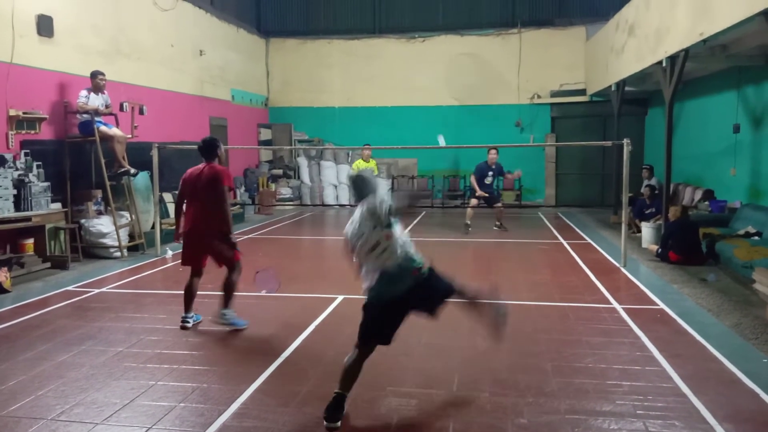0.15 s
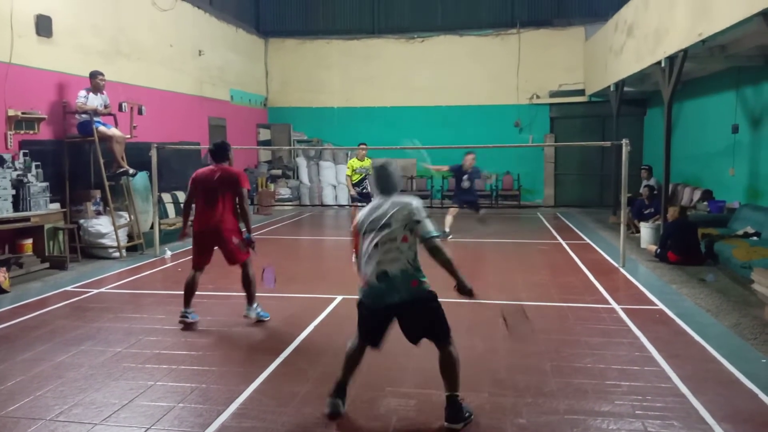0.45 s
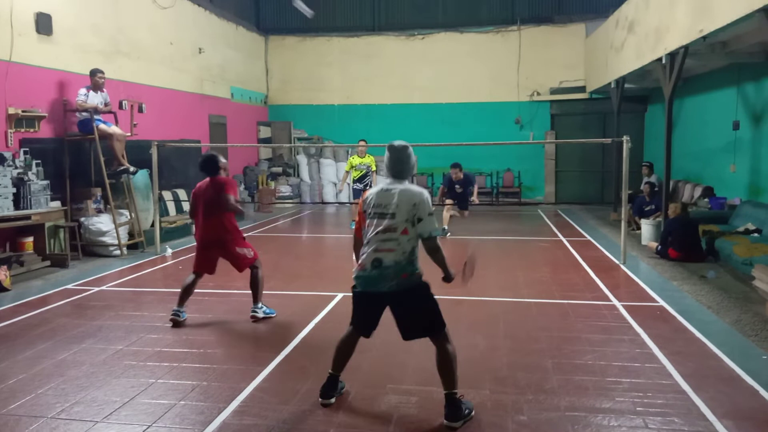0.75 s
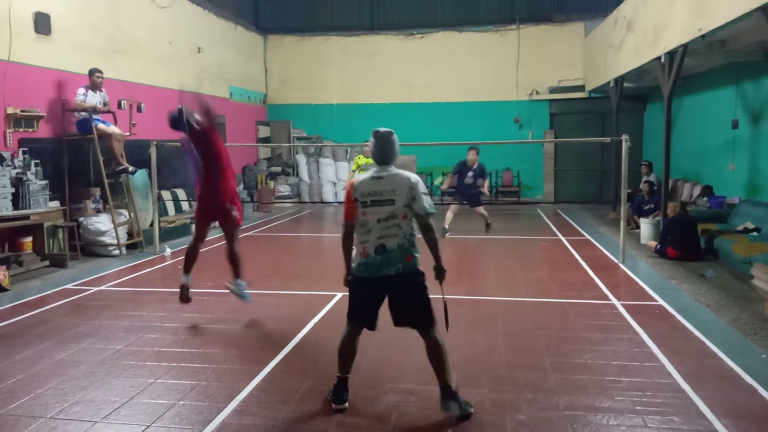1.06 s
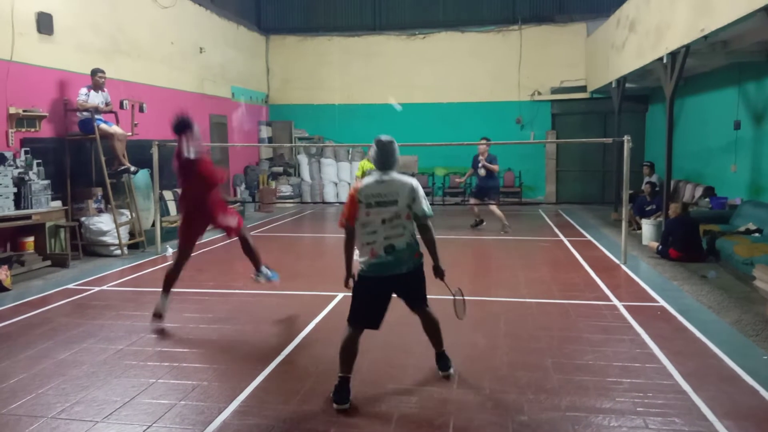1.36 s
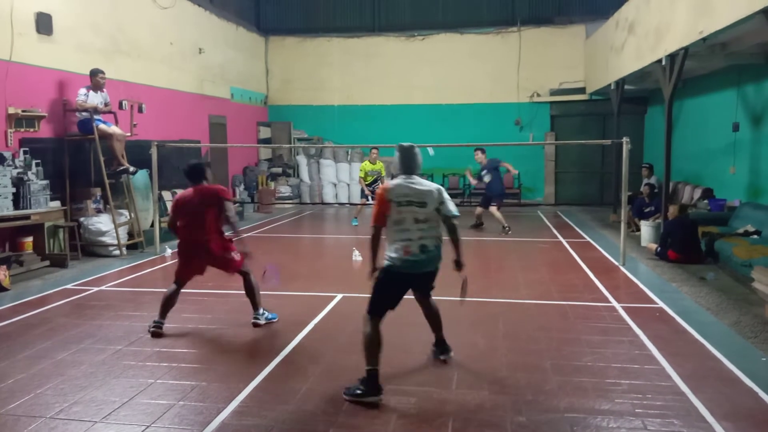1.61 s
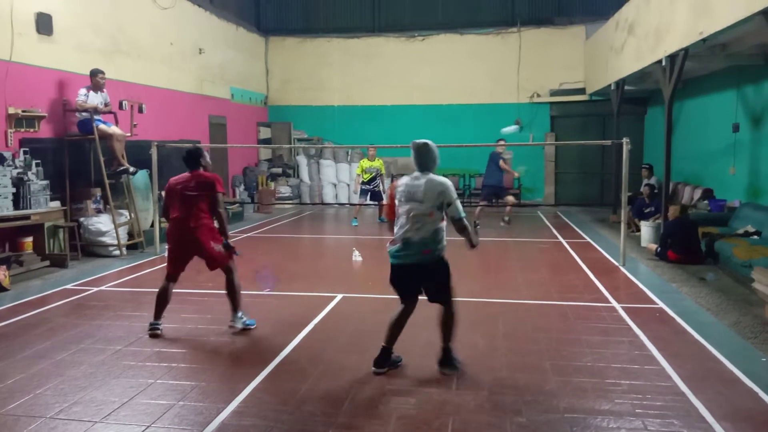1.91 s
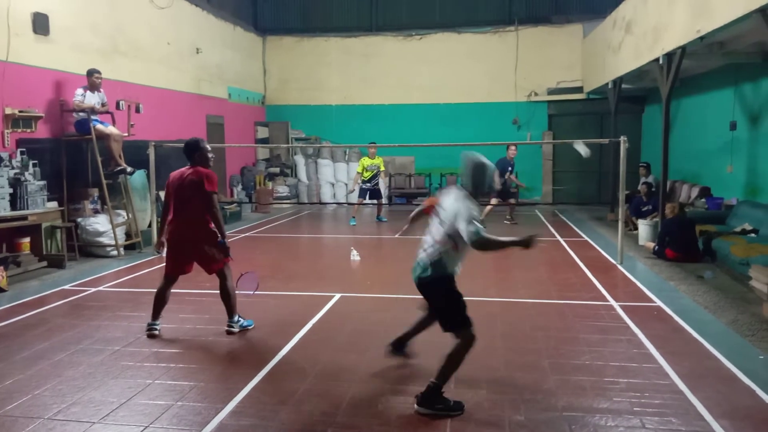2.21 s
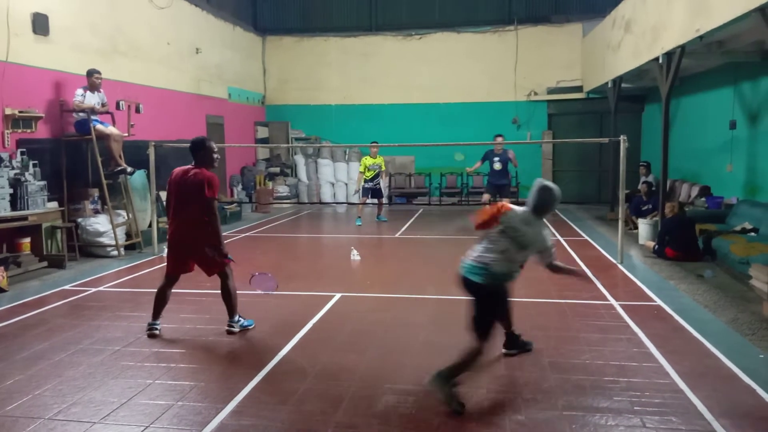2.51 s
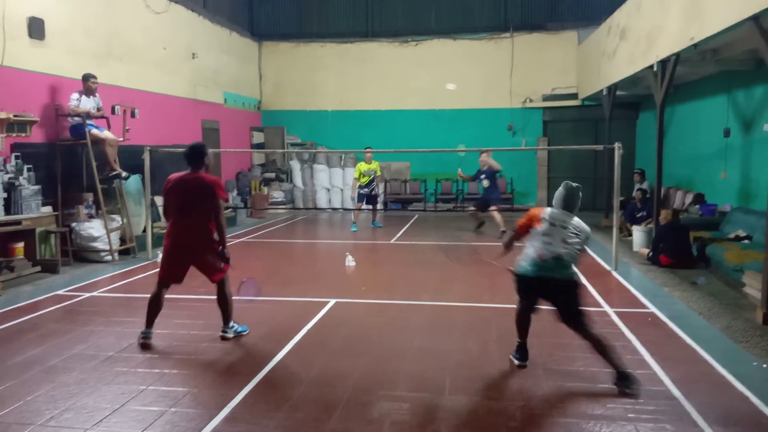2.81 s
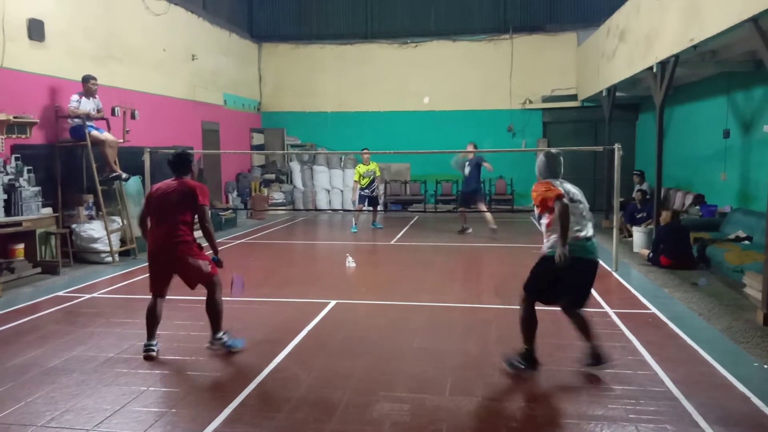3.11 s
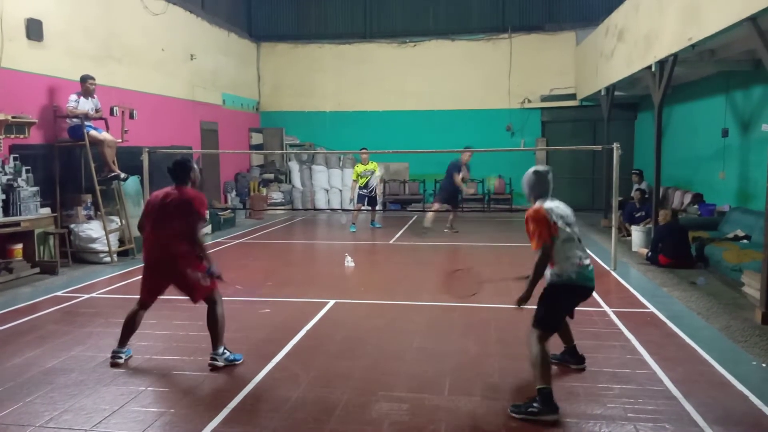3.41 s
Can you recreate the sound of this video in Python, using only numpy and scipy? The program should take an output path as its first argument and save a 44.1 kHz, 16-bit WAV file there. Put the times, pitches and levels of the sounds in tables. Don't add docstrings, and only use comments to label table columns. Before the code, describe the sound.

Sharp racket smacks in a badminton rally ring through a hard-walled hall between quick footsteps.

```python
import sys
import numpy as np
from scipy import signal
from scipy.fft import rfft, irfft
from scipy.io import wavfile
from scipy.ndimage import uniform_filter1d

SR = 44100
rng = np.random.default_rng(int(sys.argv[2]) if len(sys.argv) > 2 else 0)


def wrap_up_sound(samples):
    columns = np.atleast_2d(samples).T
    tamed = np.clip(columns, -1, 1)
    steps = np.round(tamed * 32767).astype(np.int16)
    wavfile.write(sys.argv[1], SR, steps)


def nominal_scale(level):
    x = np.asarray(level, float) / 20
    return 10 ** x


N = 156555
SPAN = 65536

# start_s, level_db, ring_hz, ring_db, tilt_db_per_octave
NEAR_HITS = [
    (-.002, -5.5, 1160, -35.5, 0.49),
    (1.205, -7, 2000, -38.5, -0.2),
    (2.589, -4.5, 1070, -34, -0.14),
]
LIFTS = [
    (1.785, -12.5, 2584, -19.5, 0.06),
]
CLEARS = [
    (3.305, -3, 2220, -31.5, -0.52),
]
# delay_s, level_db
NEAR_ECHOES = [(.0032, -4), (.0062, -4), (.0112, -6), (.0162, -9)]
LIFT_ECHOES = [(.0078, 6.5), (.0135, 2), (.0312, -1), (.0385, 0)]
CLEAR_ECHOES = [(.0028, -2), (.013, -3), (.0312, -3), (.0385, -2)]
FOOT_ECHOES = [(.0062, -9), (.0112, -7), (.0362, -10)]
# frequency_hz, t60_s
HALL_T60 = [(100, 1.13), (300, 0.73), (800, 0.95), (2600, 1.34), (6000, 1.41), (10000, 1.14), (13000, 0.9),
            (16000, 0.8)]
# rise_s, wall_return_s, wall_spread_s, wall_swell_db
NEAR_HALL = (.003, .086, .018, 3)
FAR_HALL = (.006, .04, .012, 2.5)
FOOT_HALL = (.008, .08, .02, 2)
# frequency_hz, level_db_per_hz
AIR = [(60, -4), (130, 7), (300, 0.5), (750, -10), (2500, -3.5), (6000, -10.5), (11000, -5), (15000, -15)]
# start_s, thud_db, thud_hz, slap_db, hall_db
STEPS = [(.06, -31.5, 212, -45, -20.5), (0.158, -32.5, 182, -27, -30.5), (.339, -27.5, 323, -10, -28),
         (.507, -24.5, 255, -11, -22), (0.934, -65, 199, -36.5, -28.5), (1.017, -52, 285, -25, -31.5),
         (1.205, -23, 275, -36, -29), (1.271, -26.5, 295, -29, -23.5), (1.446, -34.5, 244, -42, -25.5),
         (1.5, -26.5, 230, -16, -26.5), (1.702, -35.5, 328, -17.5, -33), (2.14, -41, 290, -37, -25),
         (2.198, -29, 278, -25, -34), (2.243, -38.5, 312, -25.5, -40), (2.59, -19, 256, -32, -25.5),
         (2.856, -27.5, 258, -19, -28.5), (2.94, -51, 302, -21.5, -18.5), (3.11, -47.5, 202, -23.5, -32),
         (3.234, -43, 297, -12, -28.5), (3.307, -25, 248, -55, -18), (1.95, -39.5, 323, -48, -19)]
# start_s, level_db, pitch_hz, swell_s, fade_s
BOOMS = [
    (0.341, -36, 122, 0.13, .15),
    (0.509, -47, 127, .01, 0.071),
    (1.5, -46, 69.6, .02, 0.052),
]
# peak_s, level_db, centre_hz, rise_s, hiss_db
SCUFFS = [
    (.36, -42.5, 2640, 0.026, -5),
    (.97, -68, 2310, 0.042, 11.5),
    (1.708, -45, 2580, 0.0091, -5),
    (2.871, -35.5, 2480, 0.0083, -8),
]
# peak_s, level_db, whoosh_hz, rise_s, string_hiss_db
SWISHES = [
    (1.183, -41.5, 490, 0.017, -1),
    (1.784, -41, 920, 0.0043, -19),
    (2.559, -44, 444, 0.025, -1),
    (3.298, -52, 870, 0.014, -16),
]
# start_s, level_db, centre_hz, width_hz, hall_db
TICKS = [
    (1.57, -11, 4640, 8000, -44),
    (1.61, -3.5, 4170, 5950, -41),
    (2.868, -7, 2410, 705, -26),
    (3.49, -4.5, 4920, 950, -20.5),
]
# frequency_hz, gain_db
MIC = [(40, -19), (90, -5), (135, -2), (5000, 1.5), (6500, 7.5), (9000, -5.5), (12800, -14.5),
       (15000, -4.5)]

CRACK_S, SLAP_S, ECHO_S = .0009, .0054, .0015


def curve(hz, points):
    p = np.array(points, float)
    return np.interp(np.log(np.maximum(hz, 1)), np.log(p[:, 0]), p[:, 1])


def colour(x, points):
    log_gain = curve(np.fft.rfftfreq(4096, 1 / SR), points) * np.log(10) / 20
    cepstrum = irfft(log_gain)
    cepstrum[1:2048] *= 2
    cepstrum[2049:] = 0
    response = irfft(np.exp(rfft(cepstrum)))[:2048]
    return signal.fftconvolve(x, response)[:len(x)]


def band(x, hz, width_hz):
    return signal.lfilter(*signal.iirpeak(min(hz, .45 * SR), hz / width_hz, SR), x)


def click(size=4096):
    return 1. * (np.arange(size) == 0)


def hit(db, ring_hz, ring_db, tilt_db):
    t = np.arange(4096) / SR
    body = [(70, -12), (250, -2 * tilt_db + 1), (1200, 4.0), (10000, 5.4 * tilt_db)]
    crack = colour(click(), body)
    ring_t60_s = .011
    ring = nominal_scale(ring_db - 60 * t / ring_t60_s) * np.cos(2 * np.pi * ring_hz * t)
    return nominal_scale(db) * (crack + ring)


def rough_contact(decay_s, size=1024):
    spatter = rng.standard_normal(size) * np.exp(-np.arange(size) / SR / decay_s)
    return .5 * click(size) + .87 * spatter / np.sqrt(np.sum(spatter ** 2))


def hall_bands():
    f, t = np.fft.rfftfreq(SPAN, 1 / SR), np.arange(SPAN) / SR
    centre_hz = 60 * 2 ** (np.arange(18) / 2)
    octaves = np.log2(np.maximum(f, 1) / centre_hz[:, None])
    share = np.cos(np.pi / 2 * np.clip(2 * octaves, -1, 1)) ** 2
    noise = irfft(rfft(rng.standard_normal(SPAN)) * share)
    decay = nominal_scale(-60 * t / curve(centre_hz, HALL_T60)[:, None])
    return noise, decay


def hall_tail(bands, tail_db, rise_s, wall_s, spread_s, wall_db):
    t = np.arange(SPAN) / SR
    noise, decay = bands
    place_gain = nominal_scale(1.2 * rng.standard_normal(len(noise)))
    tail = place_gain @ (np.roll(noise, rng.integers(SPAN), axis=1) * decay)
    clump_s = .003
    clumps = uniform_filter1d(rng.standard_normal(SPAN), int(clump_s * SR)) * np.sqrt(clump_s * SR)
    level_db = tail_db + wall_db * np.exp(-((t - wall_s) / spread_s) ** 2)
    level_db += 2.5 * clumps * np.exp(-t / .13)
    level_db += 2.5 * np.exp(-t / .02)
    return tail * nominal_scale(level_db) * (1 - np.exp(-t / rise_s))


def place_in_hall(out, at_s, sound, contact_s, bands, echoes, tail_db, *hall):
    room = hall_tail(bands, tail_db, *hall)
    room[:1024] += rough_contact(contact_s)
    for delay_s, db in echoes:
        room[int(delay_s * SR):][:1024] += nominal_scale(db) * rough_contact(ECHO_S)
    i = int(at_s * SR)
    heard = signal.fftconvolve(room, sound)[max(-i, 0):N - i]
    out[max(i, 0):max(i, 0) + len(heard)] += heard


def hall_air():
    air = colour(rng.standard_normal(N), AIR)
    return nominal_scale(-57) * air / air.std()


def footfall(thud_db, thud_hz, slap_db):
    thud = band(band(click(), thud_hz, .9 * thud_hz), thud_hz, 2.5 * thud_hz)
    thud /= np.abs(thud).max()
    slap = colour(click(), [(200, 9.5), (1000, 4.5), (2800, 3), (7000, -3.5), (15000, -5)])
    return nominal_scale(thud_db) * thud + nominal_scale(slap_db) * slap


def boom(at_s, db, hz, swell_s, fade_s):
    t = np.maximum(np.arange(N) / SR - at_s, 0)
    shape = (1 - np.exp(-t / swell_s)) * np.exp(-(t / fade_s) ** 2 / 2)
    return nominal_scale(db) * shape * np.sin(2 * np.pi * hz * t)


def rush(peak_s, db, hz, rise_s, hiss_db):
    t = np.arange(N) / SR - peak_s
    shape = np.exp(-(t / np.where(t < 0, rise_s, 1.5 * rise_s)) ** 2)
    body = band(band(rng.standard_normal(N), hz, .5 * hz), hz, .65 * hz)
    hiss = band(rng.standard_normal(N), 8000, 10400)
    return nominal_scale(db) * shape * (body / body.std() + nominal_scale(hiss_db) * hiss / hiss.std())


def scuff(peak_s, db, hz, rise_s, hiss_db):
    return rush(peak_s, db, hz, rise_s, hiss_db)


def swish(peak_s, db, whoosh_hz, rise_s, string_hiss_db):
    return rush(peak_s, db, whoosh_hz, rise_s, string_hiss_db)


def tick(db, hz, width_hz):
    return nominal_scale(db) * band(click(), hz, width_hz)


def scene():
    out, bands = np.zeros(N), hall_bands()
    for rows, echoes, tail_db, hall in [(NEAR_HITS, NEAR_ECHOES, -22.5, NEAR_HALL),
                                        (LIFTS, LIFT_ECHOES, -15.5, FAR_HALL),
                                        (CLEARS, CLEAR_ECHOES, -18.5, FAR_HALL)]:
        for at_s, *how in rows:
            place_in_hall(out, at_s, hit(*how), CRACK_S, bands, echoes, tail_db, *hall)

    bass_gain = nominal_scale(-5 * (np.arange(18) < 8))
    foot_bands = bands[0] * bass_gain[:, None], bands[1]
    for at_s, thud_db, hz, slap_db, hall_db in STEPS:
        step = footfall(thud_db, hz, slap_db)
        place_in_hall(out, at_s, step, SLAP_S, foot_bands, FOOT_ECHOES, hall_db, *FOOT_HALL)
    for at_s, db, hz, width_hz, hall_db in TICKS:
        sound = tick(db, hz, width_hz)
        place_in_hall(out, at_s, sound, CRACK_S, bands, FOOT_ECHOES, hall_db, *FOOT_HALL)

    out += sum(boom(*row) for row in BOOMS)
    out += sum(scuff(*row) for row in SCUFFS)
    out += sum(swish(*row) for row in SWISHES)
    out = colour(out + hall_air(), MIC)
    return np.array([out, out])


def hush(x):
    noise_db, depth_db = -85, -8
    cells = signal.stft(x, nperseg=512)[2]
    power = uniform_filter1d(np.abs(cells) ** 2, size=5, axis=-1)
    power = uniform_filter1d(power, size=5, axis=-2) + 1e-18
    gain = np.maximum(1 - nominal_scale(2 * noise_db) / power, nominal_scale(depth_db))
    return signal.istft(cells * gain, nperseg=512)[1][:, :N]


def roll_off(x):
    return signal.sosfilt(signal.butter(12, 17110, fs=SR, output="sos"), x)


def record(dry):
    rounded = np.tanh(2.5 * dry) / 2.5
    top_cut = signal.ellip(8, .2, 45, 15900, fs=SR, output="sos")
    finished = hush(signal.sosfilt(top_cut, rounded))
    return roll_off(finished)


dry = scene()
out = record(dry)
wrap_up_sound(out)
```